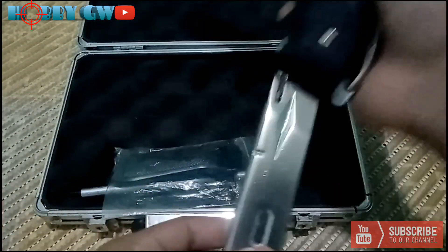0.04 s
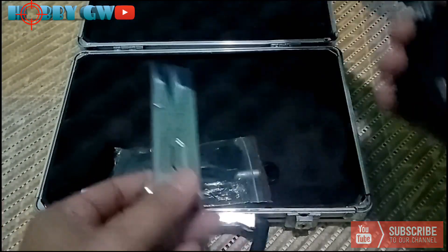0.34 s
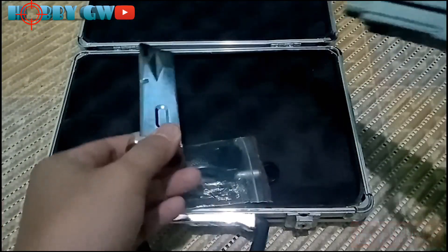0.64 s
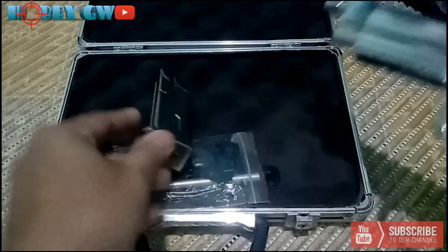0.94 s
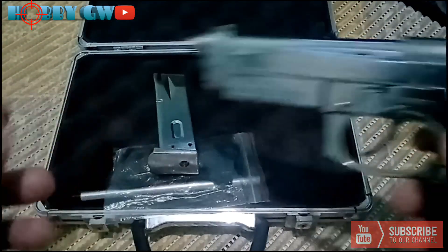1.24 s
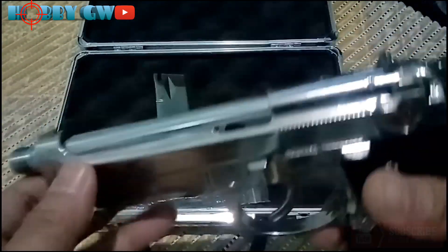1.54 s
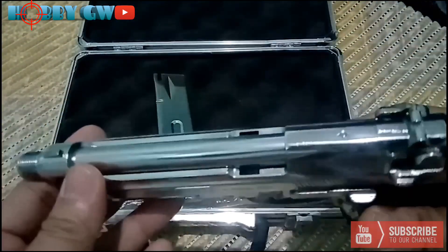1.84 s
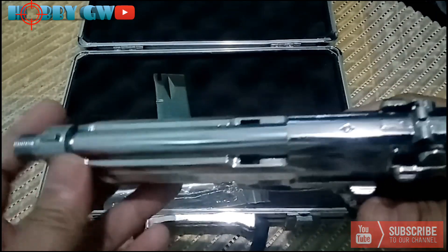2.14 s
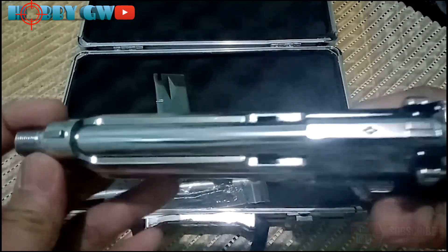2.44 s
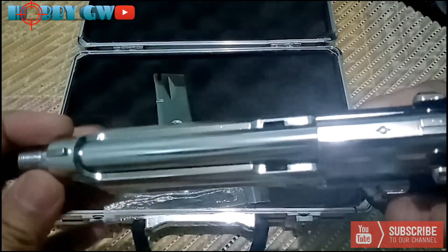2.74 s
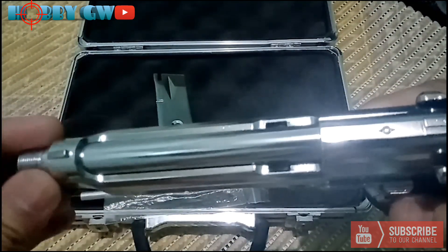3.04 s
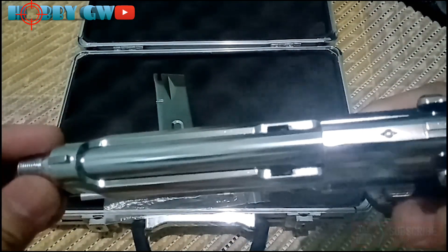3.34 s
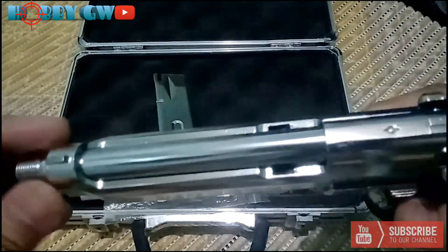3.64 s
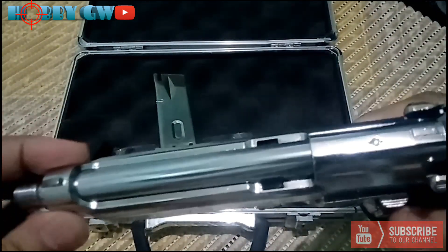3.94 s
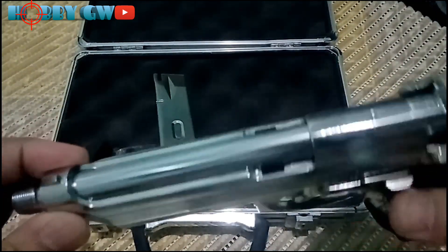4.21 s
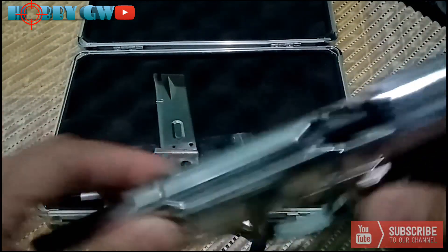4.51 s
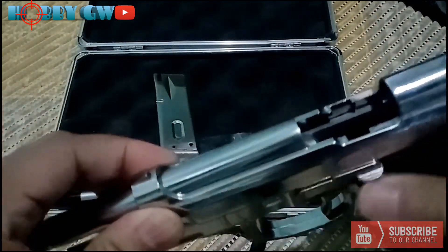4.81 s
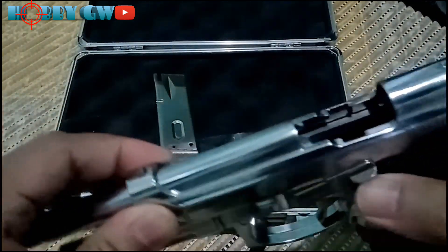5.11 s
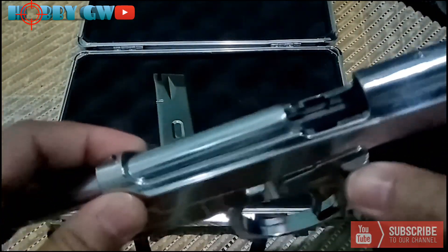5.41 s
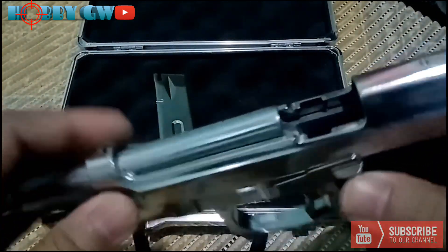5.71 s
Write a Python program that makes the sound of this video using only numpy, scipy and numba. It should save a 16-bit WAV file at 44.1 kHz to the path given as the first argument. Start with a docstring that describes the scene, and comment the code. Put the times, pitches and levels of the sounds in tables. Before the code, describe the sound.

A metal airsoft pistol is handled close to the microphone in a small room with a short echo. In the first 0.3 seconds its magazine scrapes out with several quick metallic clacks. From 0.5 to 1.1 seconds it drags very softly over a plastic bag and case lining and is set down with small taps. At about 1.2 seconds the slide slams shut, a loud rattling clack with a brief steel ring. A quiet stretch follows, with light clicks near 2.5, 3.0 and 3.8 seconds. From 4.5 seconds the slide is pulled back with a rasp and a quick run of clacks, locking at 4.7 seconds with the hardest hit. Smaller knocks and clicks come around 5.0 seconds, then a short scrape and one sharp clack at 5.6. Throughout, a faint distant tock repeats a little slower than once a second over a very quiet rumble.

```python
"""A metal airsoft pistol is handled close by in a small room. Its magazine scrapes out and is laid
in its case, the slide slams shut and is pulled back until it locks, and small parts click.
Each hit is a short burst of noise that makes the metal ring; scrapes and rustles are thousands of
tiny clicks. Something tocks faintly and regularly further off, over a quiet rumble.
A limiter turns the sound down for a moment at the hardest clacks."""
import sys
import numpy as np
from scipy import signal
from scipy.fft import rfft, irfft
from scipy.io import wavfile
from numba import njit

SR = 44100
rng = np.random.default_rng(int(sys.argv[2]) if len(sys.argv) > 2 else 0)


def master_out(mix):
    """Clip the mix to full scale and print it as 16-bit PCM to the path in sys.argv[1]."""
    frames = np.transpose(np.atleast_2d(mix))
    ceiling = np.clip(frames, -1, 1)
    pcm = np.round(ceiling * 32767).astype(np.int16)
    wavfile.write(sys.argv[1], SR, pcm)


N = 258646
T = np.arange(N) / SR
TOP_HZ = 16000

# tone of struck steel: pitch_hz, level_db
STEEL_TONE = [(88, -26.5), (150, -15.5), (504, -8.5), (871, -3), (1290, -5.5), (1420, -6.5), (2600, -4),
              (3040, -6), (3620, -3), (6640, -7), (8900, -21.5), (10400, -13.5), (13200, -26.5),
              (15100, -21), (16000, -26.5)]


def pistol(lock_s=4.708, delay_s=0.00046):
    """All the clacks: the direct sound, and what three sides of the pistol send toward the walls."""
    # metal hitting metal: start_s, level_db, bounce_loss_db, low_db, mid_db, top_db, frame_db,
    # room_db, ping_hz, ping_db
    hits = [(0.0441, -12, 25, -46, -9, -35.5, 2.5, -2, 1760, -24),
            (0.128, -24, 15, -25, -3, -26.5, 5, -1.5, 1140, -2),
            (0.14, -12, 11.5, -49, -2.5, -35, -5.5, -5.5, 1744, -6.5),
            (0.148, -18, 10, -34.5, -5.5, -24.5, 2, -9, 3840, -10),
            (0.235, -25.5, 8.5, -22.5, -2, -14, 12, 0.5, 1950, -4),
            (1.1540, -1, 13.5, -21, -13.5, -28, 0, -3.5, 2700, -17),
            (1.1591, 1, 11, -31.5, -19, -16, 0.5, -3, 6800, -12.5),
            (1.1627, 1.5, 6.5, -24, -17, -23.5, 1.5, -4, 1554, -13),
            (1.176, 5, 13.5, -22, -12.5, -17, 0, -3.5, 1440, -12),
            (1.1815, 4, 6, -25, -18, -15.5, -0.5, -1.5, 5110, -12),
            (1.1957, -0.5, 14, -30, -14, -20.5, -2, 3, 1542, -12.5),
            (4.5310, -3, 11.5, -29, -17, -19.5, 3.5, -5.5, 4436, -15),
            (4.5362, -6, 7, -20.5, -11.5, -19, 3, -5, 1570, -15.5),
            (4.6206, 2.5, 13, -39.5, -18, -24.5, 2, -7, 3670, -11),
            (4.654, -9.5, 14.5, -30, -20.5, -12, 1.5, -4, 6450, -12.5),
            (4.6611, -8, 16.5, -34, -12.5, -16, 3, -8, 6080, -9.5),
            (4.6775, -3.5, 12.5, -28.5, -19, -18.5, 3.5, -9.5, 5130, -12),
            (4.964, -13.5, 20, -15.5, -15, -20, 8, -14.5, 1490, -4.5),
            (4.9927, -7, 22.5, -33, -23.5, -12, 2.5, -12, 5460, -25),
            (5.574, 1, 12, -26, -17, -21, 10.5, -5.5, 2450, -26.5)]
    direct, sides = np.zeros(N), np.zeros((3, N))
    for start_s, db, loss_db, low_db, mid_db, top_db, frame_db, room_db, ping_hz, ping_db in hits:
        start_s += delay_s
        add(direct, start_s, rattle(db, loss_db, low_db, mid_db, top_db, frame_db, ping_hz, ping_db))
        for side in sides:  # each a little duller, with its own chatter
            add(side, start_s, rattle(db + room_db - 6.5, loss_db, low_db, mid_db, top_db - 2,
                                      frame_db, ping_hz, ping_db - 4))
    # the slide hitting its stop is the hardest hit
    add(direct, lock_s, clack(13, low_db=-37.5, mid_db=-10, top_db=-18.5, chatter_ms=4.9,
                              ping_hz=800, ping_db=-13.5))
    for side in sides:
        add(side, lock_s, clack(0.85, low_db=-38, mid_db=-15.5, top_db=-17.5, chatter_ms=4.44,
                                ping_hz=2270, ping_db=-21, frame_db=-8))
    add(direct, lock_s, thump(hz=95, db=8, decay_s=0.0033))
    # only the free slam sets the whole slide ringing; later the hand holds it
    add(direct, 1.178, slide_ring(db=-13.5))
    return direct, sides


def rattle(db, loss_db, low_db, mid_db, top_db, frame_db, ping_hz, ping_db, bounce_s=.0046):
    """A hit and three evenly spaced bounces, each weaker than the one before."""
    out = np.zeros(len(seconds(.15)))
    detune = 1 + 0.016 * rng.standard_normal()  # the changing hold shifts the frame's pitch
    for k in range(4):
        hit = clack(db - k * max(loss_db, 0), low_db, mid_db, top_db, chatter_ms=3.81,
                    ping_hz=ping_hz, ping_db=ping_db, frame_db=frame_db, detune=detune)
        add(out, k * bounce_s, hit)
    return out


def clack(db, low_db, mid_db, top_db, chatter_ms, ping_hz, ping_db, frame_db=3, detune=1):
    """One hit rings the frame and pings the struck part; where it lands makes it dull or bright."""
    # ringing notes of the frame: pitch_hz, width_hz, level_db
    frame_notes = [(1438, 48, 8), (2430, 130, -5), (3650, 53, -5.5), (4320, 42, -7), (5200, 24, -5),
                   (6330, 130, -4.5), (7200, 36, -8), (7500, 11, -14.5), (10800, 41, -14)]
    # the hand damps the frame, which makes each note wider
    held_notes = [(hz * detune, width * 3, gain_db) for hz, width, gain_db in frame_notes]
    contact = chatter(chatter_ms)
    steel = colour(contact, STEEL_TONE)
    steel = steel + amp(frame_db) * resonate(steel, held_notes)
    bands = [(178, 960, low_db), (1006.3, 2000, mid_db), (2170, 7460, -10), (9000, 16000, top_db)]
    body = sum(amp(band_db) * unit(band(steel, lo, hi, order=4)) for lo, hi, band_db in bands)
    ping = ring_twice(contact, ping_hz, 160, 960)
    return burst(body + amp(ping_db) * unit(ping), db, chatter_ms, crest_db=10)


def chatter(length_ms, steepness=1.8):
    """Hard parts shake against each other for a few milliseconds before they settle."""
    t = seconds(.06)
    return rng.standard_normal(len(t)) * np.exp(-(t * 1000 / max(length_ms, .5)) ** steepness)


def slide_ring(db, blur_hz=22, blur_depth=0.98):
    """The slide rings with many close notes, blurred by its loose fit on the frame."""
    # ringing notes of the slide: pitch_hz, level_db
    slide_notes = [(1415, -3), (1478, -1), (1542, 0.5), (1700, -5), (2617, 0.5), (2885, -1), (3275, -2),
                   (3710, -5), (4078, 1), (4264, -6), (4409, -3), (4543, -3), (4705, -6), (4882, -4),
                   (5180, 1), (5470, -3.5), (5857, -7.5), (6618, -2), (6669, -3.5)]
    t, ring = seconds(.5), 0
    for hz, gain_db in slide_notes:
        wobble = lowpass(rng.standard_normal((2, 2 * len(t))), blur_hz)[:, len(t):]
        blur = blur_depth * unit(wobble)
        phase = 2 * np.pi * (hz * t + rng.random())
        ring = ring + amp(gain_db) * ((1 + blur[0]) * np.sin(phase) + blur[1] * np.cos(phase))
    ring = ring * fade(t, fade_s=.27)
    return ring * amp(db) / np.std(ring[t < .02])


def thump(hz, db, decay_s):
    """The jolt of the slide: a sudden push and one low swing that dies at once."""
    t = seconds(.1)
    swing = amp(db) * np.exp(-t / decay_s) * np.cos(2 * np.pi * hz * t)
    return lowpass(swing, 420)


def grip_knocks(width_hz=330):
    """Loose parts knock in the hollow grip: one dull note with a faint edge of steel."""
    # knocks: start_s, peak_db, pitch_hz, chatter_ms
    knocks = [(0.969, -34, 1400, 5), (1.065, -40.5, 1359, 4.07), (3.389, -46, 1560, 3.9),
              (4.4936, -27.5, 1417, 6), (4.514, -34, 1420, 26), (4.666, -22.5, 1437, 15),
              (4.94, -24, 1770, 3.4), (4.949, -24.5, 1530, 3), (4.983, -23.5, 1530, 3.6),
              (5.022, -35.5, 1416, 3.3)]
    out = np.zeros(N)
    for start_s, db, hz, chatter_ms in knocks:
        contact = chatter(chatter_ms)
        hollow = ring_twice(contact, hz, width_hz, width_hz)
        add(out, start_s, peak(hollow + amp(-30.5) * colour(contact, STEEL_TONE), db))
    return out


def rubbing(damping=0.31):
    """Metal slides on metal in tiny slips, ringing a hollow that changes from stroke to stroke."""
    # tone of the rubbing: pitch_hz, level_db
    rub_tone = [(120, -74.5), (200, -41.5), (509, -29.5), (735, -5), (883, -18.5), (1160, -7),
                (1770, -14.5), (2210, -7.5), (3970, -12), (5420, -13), (7540, -19.5), (8270, -29.5),
                (10700, -25.5), (16000, -27.5)]
    # ringing notes of the rubbed metal: pitch_hz, width_hz, level_db
    rub_notes = [(3570, 76, 3), (5600, 100, 7.5), (6535, 1100, 4), (10400, 1600, 2.5)]
    # magazine and slide moving along their guides: start_s, length_s, rasp_db, hiss_db, hollow_hz
    strokes = [(0, 0.03, -31, -38, 766), (0.056, 0.064, -42.5, -38.5, 905),
               (0.098, 0.027, -30.5, -47.5, 832), (0.132, 0.026, -51, -41, 905),
               (0.196, 0.12, -71, -58, 1700), (0.9, 0.055, -45, -48, 1306),
               (0.966, 0.035, -38.5, -49.5, 808), (1.022, 0.081, -52.5, -57.5, 1248),
               (1.145, 0.0067, -39.5, -46.5, 1300), (2.227, 0.011, -55.5, -65, 1520),
               (4.485, 0.043, -46.5, -42, 1400), (4.634, 0.05, -28, -29, 1388),
               (4.944, 0.013, -32, -52.5, 747), (4.976, 0.0082, -46.5, -35.5, 905),
               (5.471, 0.039, -47.5, -67, 546), (5.531, 0.047, -49, -42.5, 1420)]
    slips = tiny_clicks(per_s=7000, spread_db=1.5)
    rub = colour(slips, rub_tone)
    rasp = unit(band(rub, 500, 2000)) * amp(-6)
    hiss = unit(band(rub + resonate(rub, rub_notes), 3600, 15000)) * amp(-1)
    out = np.zeros(N)
    for start_s, length_s, rasp_db, hiss_db, hz in strokes:
        hollow = unit(ring_twice(slips, hz, damping * hz, 2 * damping * hz)) * amp(-4.5)
        out += stroke(start_s, length_s) * ((rasp + hollow) * amp(rasp_db) + hiss * amp(hiss_db))
    return out * judder()


def stroke(start_s, length_s, build_db=3, release_s=0.024):
    """Loudness of one stroke: the parts take hold, the pressure builds, the hand lets go."""
    t = np.maximum(T - start_s, 0)
    progress = np.minimum(t / length_s, 1)
    hold = 1 - np.exp(-progress / .25)
    release = np.exp(-np.maximum(t - length_s, 0) / release_s)
    return hold * amp(build_db * (progress - 1)) * release


def judder(catches_per_s=230, depth_db=2):
    """Uneven loudness of a sliding part that keeps catching and coming free."""
    return unit(flicker(catches_per_s, depth_db, count=4096))


def ticks(chatter_ms=2.7, ring_width_hz=700):
    """Small parts touch sharply once and chatter, with a short, dry ring."""
    # light touches: start_s, level_db, pitch_hz
    touches = [(0.905, -32, 2890), (0.944, -31, 3100), (0.995, -32, 4300), (1.037, -33.5, 2900),
               (2.232, -46.5, 2420), (2.4567, -23.5, 4630), (2.9771, -25.5, 3700), (3.7553, -20.5, 3100)]
    # tone of a tick: pitch_hz, level_db
    tick_tone = [(470, -59.5), (800, -35), (1700, -17), (2400, 0), (3000, 0.5), (3600, -3.5), (5000, -0.5),
                 (6700, -7), (7730, -20), (8880, -27.5), (10300, -22.5), (11800, -42.5), (16000, -65)]
    out, t = np.zeros(N), seconds(.15)
    for start_s, db, hz in touches:
        contact = amp(-20) * rng.standard_normal(len(t)) * fade(t, fade_s=.14)  # faint after-ring
        add(contact, 0, chatter(chatter_ms, steepness=0.9))
        contact[0] += amp(11)  # the sharp first touch
        tick = band(colour(contact, tick_tone), 1100, 15000)
        tick = tick + resonate(tick, [(hz, ring_width_hz, -5)])
        add(out, start_s + 0.0015, burst(tick, db, chatter_ms, crest_db=10.5))
    return out


def case_rustle():
    """The magazine drags over the case's lining and plastic bag, scraping lower as it is pressed."""
    # course of the drag: time_s, level_db, scrape_hz
    drag = [(.47, -86, 6170), (.54, -70, 5800), (.635, -71, 5060), (.68, -58.5, 4260), (.72, -68, 3650),
            (.78, -65, 3442), (.88, -71, 3350), (1.0, -65.5, 3401), (1.13, -89.5, 3401)]
    # tone of the crinkles: pitch_hz, level_db
    crinkle_tone = [(1500, -22), (2800, -6.5), (3600, -5.5), (5000, -6.5), (6300, -0.5), (8500, -13),
                    (10800, -1.5), (13500, -6), (16000, -11.5)]
    catches = tiny_clicks(per_s=2500, spread_db=0.5)
    crinkles = colour(catches, crinkle_tone)
    # each pitch range comes and goes by itself
    edges_hz = np.geomspace(2000, TOP_HZ, 10)
    patchy = sum(band(crinkles, lo, hi) * flicker(per_s=26, depth_db=3.5, count=512)
                 for lo, hi in zip(edges_hz, edges_hz[1:]))
    time_s, db, hz = np.transpose(drag)
    scrape = glide(catches, np.interp(T, time_s, hz), width_hz=650)
    loudness = np.interp(T, time_s, amp(db), left=0, right=0)
    return (unit(patchy) + amp(-5) * unit(scrape)) * loudness


def distant_tocks(rise_s=0.0037, decay_s=.034, lead_s=0.0088, detune=0.016):
    """A faint, regular tock across the room: a short puff that rings a few notes, never quite at the same
    pitch."""
    # tocks: time_s, peak_db
    beats = [(0.86, -45.5), (2.014, -47), (3.173, -51.5), (4.317, -45.5), (5.472, -45.5)]
    # ringing notes of a tock: pitch_hz, width_hz, level_db
    tock_notes = [(529.5, 88, 1.5), (1282, 75, 0.5), (1598, 59, -8), (2105, 32, -7), (2980, 71, -21.5)]
    out, t = np.zeros(N), seconds(.3)
    for time_s, db in beats:
        puff = rng.standard_normal(len(t)) * (1 - np.exp(-t / rise_s)) * np.exp(-t / decay_s)
        ring = sum(amp(gain_db) * ring_twice(puff, hz * (1 + detune * rng.standard_normal()), width, 450)
                   for hz, width, gain_db in tock_notes)
        add(out, time_s - lead_s, peak(ring, db))
    return out


def room_echo(x, echo_db=-5, build_s=0.015):
    """The walls of a small room return a dense echo that builds fast and soon dies."""
    # echo by pitch range: low_hz, high_hz, fade_s, level_db
    echo_bands = [(150, 990, 0.18, 6), (890, 2200, 0.25, 1), (2292, 5200, 0.28, 2), (4800, 8900, 0.26, 4),
                  (8050, 16000, 0.21, -0.5)]
    t = seconds(.6)
    noise = rng.standard_normal(len(t)) * (1 - np.exp(-t / build_s))
    tail = sum(band(noise, lo, hi) * amp(db) * fade(t, fade_s) for lo, hi, fade_s, db in echo_bands)
    return through(x, tail * amp(echo_db) / np.linalg.norm(tail))


def background(level_db=-70):
    """A steady, very quiet rumble with a trace of hiss."""
    # tone of the quiet room: pitch_hz, level_db
    quiet_tone = [(15, -22), (25, -6), (53, -6.5), (120, -3), (153, -5), (344, -22.5), (394, -19),
                  (531, -21), (1160, -27), (4030, -32), (6740, -37), (14800, -39.5), (16000, -48)]
    return unit(colour(rng.standard_normal(N), quiet_tone, size=4096)) * amp(level_db)


def tiny_clicks(per_s, spread_db):
    """Clicks at random times, a few stronger than the rest."""
    clicks = (rng.random(N) < per_s / SR) * rng.standard_normal(N)
    return clicks * amp(spread_db * np.minimum(rng.exponential(size=N), 4))


def flicker(per_s, depth_db, count):
    """A gain that wanders between random levels."""
    return amp(depth_db * np.interp(T * per_s, np.arange(count), rng.standard_normal(count)))


def fade(t, fade_s):
    """A gain that falls by 60 dB in fade_s."""
    return np.exp(-np.log(1000) * t / fade_s)


def amp(db):
    """Turn decibels into a gain."""
    return 10 ** (np.asarray(db) / 20)


def unit(x):
    """Scale to an average power of 1."""
    return x / np.sqrt(np.mean(x ** 2) + 1e-30)


def peak(x, db):
    """Scale to a peak level."""
    return x * amp(db) / np.abs(x).max()


def burst(x, db, length_ms, crest_db):
    """Scale a short sound so its average level over length_ms lies crest_db below db."""
    return x * amp(db - crest_db) / np.sqrt(np.sum(x ** 2) / (max(length_ms, .5) * SR / 1000))


def seconds(length_s):
    """Sample times of a short sound."""
    return np.arange(int(length_s * SR)) / SR


def add(track, start_s, x):
    """Mix a sound into a track."""
    i = int(start_s * SR)
    track[i:i + len(x)] += x[:N - i]


def through(x, response):
    """Filter a sound, given the filter's answer to a single click."""
    return signal.fftconvolve(x, response)[:len(x)]


def lowpass(x, hz):
    """Keep what lies below a pitch."""
    return signal.sosfilt(signal.butter(2, hz, fs=SR, output="sos"), x)


def band(x, low_hz, high_hz, order=3):
    """Keep what lies between two pitches."""
    return signal.sosfilt(signal.butter(order, [low_hz, high_hz], "band", fs=SR, output="sos"), x)


def colour(x, points, size=1024):
    """Shape the tone to follow (pitch_hz, level_db) points."""
    hz, db = np.transpose(points)
    grid_hz = np.arange(size + 1) * SR / (2 * size)
    gain = amp(np.interp(np.log(grid_hz + 1), np.log(hz), db))
    # build the filter so that nothing sounds ahead of a hit
    cepstrum = irfft(np.log(gain))[:size]
    cepstrum[1:] *= 2
    return through(x, irfft(np.exp(rfft(cepstrum, 2 * size))))


def resonate(x, notes):
    """Ring several notes (pitch_hz, width_hz, level_db) side by side."""
    return sum(amp(db) * signal.lfilter(*signal.iirpeak(hz, hz / width, SR), x)
               for hz, width, db in notes)


def ring_twice(x, hz, width_hz, second_width_hz):
    """Ring one note twice in a row, so less sound gets by at other pitches."""
    return resonate(resonate(x, [(hz, width_hz, 0)]), [(hz, second_width_hz, 0)])


def glide(x, hz, width_hz):
    """Ring a note whose pitch follows the curve hz."""
    turn = np.exp(2j * np.pi * np.cumsum(hz) / SR)
    return np.real(turn * lowpass(x / turn, width_hz / 2))


def scene():
    """The pistol up close, with the room's echo, the tocks and the background around it."""
    clacks, sides = pistol()
    handling = grip_knocks() + rubbing() + case_rustle()
    ticking = ticks()
    echo = sum(room_echo(side) for side in sides) + room_echo(amp(-7) * handling + amp(-18) * ticking)
    return (clacks + handling + ticking + echo + background() + distant_tocks())[None]


@njit
def follow(x, attack, release):
    """Track the loudness, rising fast and falling slowly."""
    out, level = np.empty(len(x)), 0.
    for i in range(len(x)):
        level += (abs(x[i]) - level) * (attack if abs(x[i]) > level else release)
        out[i] = level
    return out


def record(dry, ceiling_db=-2, attack_s=0.00051, release_s=0.044, bass_hz=58):
    """A limiter turns down the hardest hits, deep bass is lost, peaks clip, and the top is cut."""
    level = follow(dry[0], 1 - np.exp(-1 / (attack_s * SR)), 1 - np.exp(-1 / (release_s * SR)))
    limited = dry / np.maximum(level / amp(ceiling_db), 1)
    thinned = signal.sosfilt(signal.butter(4, bass_hz, "high", fs=SR, output="sos"), limited)
    clipped = np.clip(thinned, -1, 1)
    return signal.sosfilt(signal.ellip(8, .2, 80, TOP_HZ, fs=SR, output="sos"), clipped)


dry = scene()
out = record(dry)
master_out(out)
```